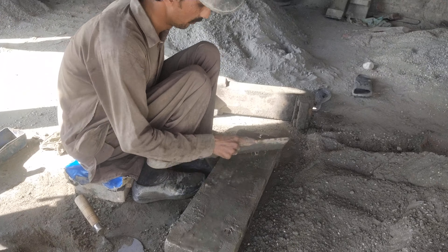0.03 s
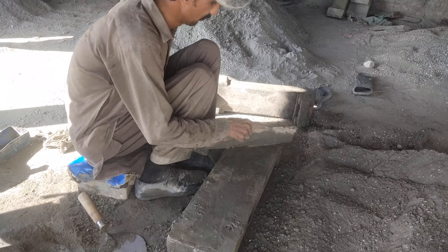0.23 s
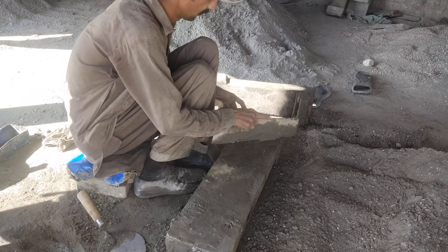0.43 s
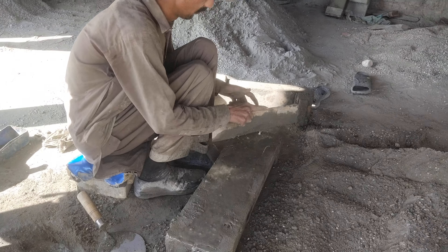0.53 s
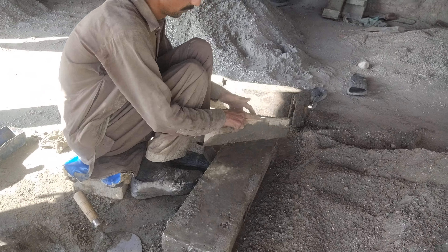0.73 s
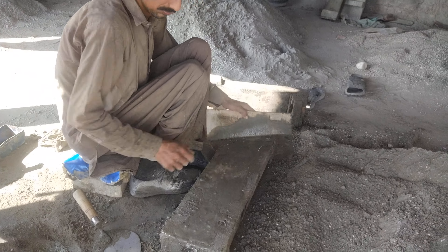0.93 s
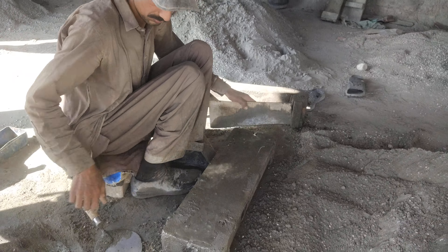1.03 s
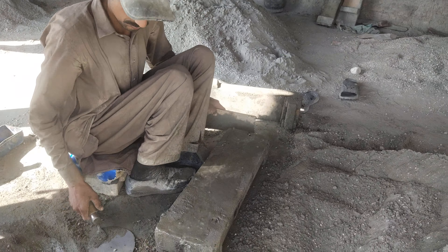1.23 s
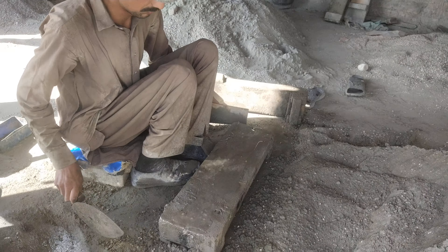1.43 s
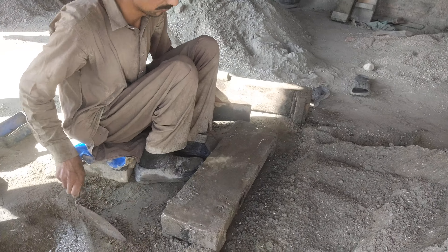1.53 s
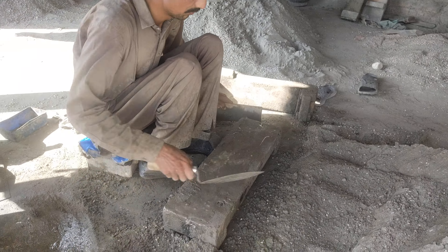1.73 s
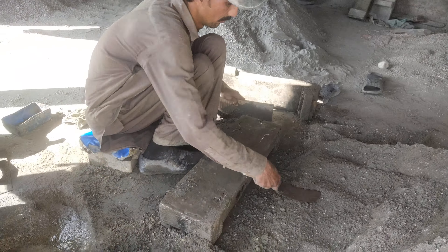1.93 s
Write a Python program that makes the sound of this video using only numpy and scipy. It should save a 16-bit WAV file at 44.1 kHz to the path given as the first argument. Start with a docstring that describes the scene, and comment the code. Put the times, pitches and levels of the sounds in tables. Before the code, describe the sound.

A cement block is patted three times before a steel trowel scrapes through sand and clacks.

```python
"""Under an open shed roof, a mason pats a fresh cement block three times: dull, hollow thumps
from the damped block, with a short echo off the walls. Sand rubs, a sleeve brushes and grit scrapes
as he shifts and reaches for a steel trowel. Slipping grains make the blade sing as it drags;
it clacks once on stone and slides on through the sand. A faint hum and distant rumble lie underneath."""
import sys
import numpy as np
from scipy import signal
from scipy.fft import rfft, irfft
from scipy.io import wavfile
from scipy.ndimage import uniform_filter1d

SR = 44100
rng = np.random.default_rng(int(sys.argv[2]) if len(sys.argv) > 2 else 0)


def generate_wav(sig):
    """Save sig (samples, or channels by samples) to the path in sys.argv[1] as 16-bit PCM at SR."""
    pcm = np.round(np.clip(np.atleast_2d(sig).T, -1, 1) * 32767).astype(np.int16)
    wavfile.write(sys.argv[1], SR, pcm)


N = 88200
T = np.arange(N) / SR
BIN_HZ = np.arange(N // 2 + 1) * SR / N


def from_db(db):
    """Decibels to gain."""
    return 10 ** (np.asarray(db) / 20)


def rms_one(x):
    """Scale to rms 1."""
    return x / np.sqrt(np.mean(x ** 2) + 1e-20)


def at_hz(points, hz):
    """Read a table on a log-frequency axis."""
    knots_hz, values = np.transpose(points)
    return np.interp(np.log(np.maximum(hz, 1)), np.log(knots_hz), values)


def envelope(rows):
    """Gain along a (t/s, level/dB) curve; silent beyond 30 ms outside it."""
    s, db = np.transpose(rows)
    return from_db(np.interp(T, s, db)) * (T >= s[0] - .03) * (T <= s[-1] + .03)


def bursts(rows, t60_s):
    """Envelope that jumps at each (t/s, level/dB) row and decays."""
    power = sum(from_db(2 * (db - 60 * np.maximum(T - s, 0) / t60_s)) * (T >= s) for s, db in rows)
    return np.sqrt(power)


def clicks(rows):
    """One impulse per (t/s, level/dB) row."""
    out = np.zeros(N)
    for s, db in rows:
        out[min(int(s * SR), N - 1)] += from_db(db)
    return out


def panned(db):
    """Constant-power gains, left minus right in dB."""
    gains = np.array([from_db(db / 2), from_db(-db / 2)]).reshape(2, -1)
    return gains / np.sqrt(np.mean(gains ** 2, axis=0))


def butter(x, order, hz, kind="low"):
    """Butterworth filter."""
    return signal.sosfilt(signal.butter(order, hz, kind, fs=SR, output="sos"), x)


def convolve(x, response):
    """Pass a sound through an impulse response."""
    return signal.fftconvolve(np.atleast_2d(x), np.atleast_2d(response), axes=1)[:, :N]


def ring(x, hz, t60_s):
    """One mode: a click starts a decaying sine."""
    radius, angle = from_db(-60 / (t60_s * SR)), 2 * np.pi * hz / SR
    return signal.lfilter([0, np.sin(angle)], [1, -2 * radius * np.cos(angle), radius ** 2], x + 1e-18)


def white():
    """Two independent white noises."""
    return rng.standard_normal((2, N))


def grit(grains_per_s=9000, spread_db=2.2):
    """Sand grains slip at random, a few much larger than the rest."""
    sizes = from_db(spread_db * np.minimum(rng.exponential(1, N), 5))
    return white() * sizes * (rng.random(N) < grains_per_s / SR)


def rubbed(modes):
    """Slipping grains excite a set of modes; rms 1."""
    slips = grit()
    return rms_one(sum(from_db(db) * ring(slips, hz, t60_s) for hz, db, t60_s in modes))


# Diffuse field: f/Hz, left-right correlation
CORRELATION = [(100, 0.95), (300, .88), (600, 0.33), (1200, -0.38), (2500, -0.014), (16000, -0.0078)]
def coloured(pair, spectrum, pan=None):
    """Two independent noises to diffuse stereo of a given spectrum; rms 1."""
    mid, side = rfft(pair)
    alike = np.clip(at_hz(CORRELATION, BIN_HZ), -.99, .99)
    stereo = np.sqrt(1 + alike) * mid + np.sqrt(1 - alike) * side * [[1], [-1]]
    if pan is not None:
        stereo = stereo * panned(at_hz(pan, BIN_HZ))
    return rms_one(irfft(stereo * from_db(at_hz(spectrum, BIN_HZ)), N))


# Rumble: f/Hz, level/dB
RUMBLE_SPECTRUM = [(25, -46), (45, -33), (68, 8), (90, 2), (130, 8), (220, -4.5), (400, -8.5), (1000, -10),
                   (3000, -16.5), (8000, -27.5), (16000, -44)]
# Hum: f/Hz, level/dB
HUM_TONES = [(67.3, -64.5), (203, -57)]
def background():
    """Distant rumble and a slightly wavering hum."""
    out = from_db(-61) * coloured(white(), RUMBLE_SPECTRUM)
    for hz, db in HUM_TONES:
        waver_hz = 1.98 * rms_one(uniform_filter1d(rng.standard_normal(N), size=6000))
        phase = 2 * np.pi * np.cumsum(hz + waver_hz) / SR
        out = out + from_db(db) * np.sqrt(2) * np.sin(phase)
    return out


# Rubbing: t/s, level/dB
RUB_LEVEL = [(0, -52), (.06, -59.5), (.125, -67), (.15, -67.5), (.22, -68), (.3, -63), (.43, -89),
             (.53, -72), (.58, -53), (.64, -44.5), (.68, -50.5), (.75, -60), (.95, -62.5)]
# Rubbed sand: f/Hz, level/dB
RUB_SPECTRUM = [(400, -20), (1200, 6.5), (1600, 3), (2000, 0), (2650, -11), (3300, -2.5), (4500, -11.5),
                (7000, -16), (10000, -26.5), (14000, -18), (16000, -27)]
# Block face: f/Hz, level/dB, t60/s
FACE_MODES = [(1563, 0.5, .04), (2654, 2, .03), (3230, -4.5, 0.035), (5640, -10, 0.01)]
def sand_rub():
    """Sand rubs on the block and makes its face rasp."""
    sand = from_db(-0.5) * coloured(grit(), RUB_SPECTRUM)
    rasp = from_db(-6.5) * rubbed(FACE_MODES)
    return envelope(RUB_LEVEL) * (sand + rasp)


# Body movement: t/s, level/dB
SHUFFLE_LEVEL = [(0, -53), (.1, -54.5), (.22, -60.5), (.95, -54.5), (1.1, -50.5), (1.25, -58.5),
                 (1.31, -49), (1.39, -46.5), (1.48, -53.5), (1.76, -54), (1.83, -43), (1.9, -51.5),
                 (2.0, -54.5)]
# Feet and clothes: f/Hz, level/dB
SHUFFLE_SPECTRUM = [(100, -26.5), (200, -3.5), (310, 1.5), (450, -2), (560, -4.5), (700, -9.5), (1500, -14),
                    (4000, -32.5)]
def shuffle():
    """Low noise of shifting feet and clothes."""
    return envelope(SHUFFLE_LEVEL) * coloured(white(), SHUFFLE_SPECTRUM)


# Brushing: t/s, level/dB
SLEEVE_LEVEL = [(.125, -94), (.145, -58.5), (.185, -73), (.21, -60), (.24, -64)]
# Cloth: f/Hz, level/dB
SLEEVE_SPECTRUM = [(4000, -24.5), (6300, -5), (7200, -1.5), (9000, -10), (11000, -9), (14500, -5),
                   (16000, -5.5)]
def sleeve():
    """A sleeve brushes past with a grainy hiss."""
    return envelope(SLEEVE_LEVEL) * coloured(grit(), SLEEVE_SPECTRUM)


# Two or three contacts per pat: t/s, level/dB, low-pass f/Hz, hollow boost/dB
PAT_CONTACTS = [(0.2423, -24.5, 1330, -28), (0.2446, -17.5, 1150, -14), (0.2507, -14, 1500, 2.5),
                (0.4558, -15.5, 900, 4), (0.458, -9, 1490, 4.5), (0.6486, -12.5, 2750, -0.5),
                (0.6506, -4.5, 1320, -1)]
# Block in its mould: f/Hz, level/dB, t60/s
BLOCK_MODES = [(295.6, -25.5, 0.13), (415, -13, 0.047), (461, -14.5, 0.031), (591.4, -11, 0.049),
               (709, -7, 0.026), (900, -7.5, 0.009), (1074, -15.5, 0.022), (1340, -19, 0.014),
               (2584, -6.5, 0.0034), (2870, -32, 0.0017)]
# Off the ground and nearby blocks: delay/s, level/dB
NEAR_REFLECTIONS = [(.0077, -11), (.0127, -13), (.0175, -20)]
def pats(hollow_hz=397, hollow_width_hz=28, wall_hz=260.4):
    """Soft contacts ring the damped block; close surfaces reflect it, a near wall only its lows."""
    forces = np.array([butter(clicks([(s, db)]) + 1e-18, 2, hz) for s, db, hz, _ in PAT_CONTACTS])
    hollow_db = np.array(PAT_CONTACTS)[:, 3]
    pan = [(400, 4.0), (650, 1.0), (1200, -4.0)]
    body = 0
    for hz, db, t60_s in BLOCK_MODES:
        hollow_share = np.exp(-((hz - hollow_hz) / hollow_width_hz) ** 2)
        drive = from_db(hollow_db * hollow_share) @ forces
        body = body + from_db(db) * ring(drive, hz, t60_s) * panned(at_hz(pan, hz))
    body = butter(body, 4, 228, "high")
    nearby = butter(clicks(NEAR_REFLECTIONS), 1, 1500)
    wall = butter(clicks([(.029, -2)]), 2, [wall_hz / 1.18, wall_hz * 1.18], "band")
    return body + convolve(body, nearby + wall)


# Reverberation: f/Hz, t60/s
SHED_DECAY = [(150, 0.78), (400, 0.3665), (1000, 0.49), (3000, 0.47), (12000, 0.75)]
# Reverberation: f/Hz, level/dB
SHED_SPECTRUM = [(110, -24), (170, 3.5), (240, 4), (290, 4), (335, -0.5), (420, 4), (650, 4), (1200, 0.5),
                 (3000, 0.5), (8000, -3), (16000, -12)]
def shed(build_s=0.0059, echo_s=.098, echo_build_s=0.0035):
    """Diffuse response of the shed, decaying band by band, plus a dull echo off a far wall."""
    noise = rfft(np.array([coloured(white(), SHED_SPECTRUM) for _ in range(2)]))
    centres_hz, tails = np.geomspace(100, 16000, 9), 0
    for hz in centres_hz:
        band = at_hz(np.column_stack([centres_hz, centres_hz == hz]), BIN_HZ)
        tails = tails + irfft(noise * band, N) * from_db(-60 * T / at_hz(SHED_DECAY, hz))
    diffuse = tails[0] * (1 - np.exp(-T / build_s))
    far_wall = butter(tails[1] * (1 - np.exp(-T / echo_build_s)), 2, 800)
    echo = convolve(clicks([(echo_s, -8.5)]), far_wall)
    return rms_one(diffuse + echo) / np.sqrt(N) * from_db(-3.5)


# Crushes: t/s, level/dB
CRUSH_BURSTS = [(0.2485, -34.5), (0.457, -42.5), (0.648, -35.5)]
# Crushed sand: f/Hz, level/dB
CRUSH_SPECTRUM = [(500, 3), (1500, 7.5), (3200, -1), (4200, -9), (6800, -8), (9000, -20.5), (14000, -6),
                  (16000, -24)]
def sand_crush():
    """Each pat crushes a little sand."""
    return coloured(grit(), CRUSH_SPECTRUM) * bursts(CRUSH_BURSTS, t60_s=0.056)


# Scraping: t/s, level/dB
SCRAPE_LEVEL = [(.95, -101), (.985, -54.5), (1.02, -44), (1.09, -49), (1.17, -48), (1.26, -49),
                (1.295, -38), (1.34, -45.5), (1.42, -48.5), (1.49, -55.5), (1.55, -53.5), (1.65, -57),
                (1.73, -58.5), (1.81, -43), (1.89, -50.5), (1.96, -44.5), (2.0, -45)]
# Scrape noise; thin tones ride above it near 6.8 and 14.8 kHz: f/Hz, level/dB
SCRAPE_SPECTRUM = [(50, -38), (300, -19), (750, -7.5), (1050, -5.5), (1700, -2), (3000, -5.5),
                   (5500, -12.5), (6800, -8), (8500, -19), (11000, -19.5), (13000, -19), (14800, -11.5),
                   (16000, -32)]
def ground_scrape():
    """Grit scrapes on the ground, louder with pressure."""
    pan = [(1000, -2), (6000, -0.5), (13000, 4.5)]
    return envelope(SCRAPE_LEVEL) * coloured(grit(), SCRAPE_SPECTRUM, pan)


# Dragging: t/s, level/dB
DRAG_LEVEL = [(1.26, -70), (1.295, -38.5), (1.33, -45), (1.4, -54), (1.5, -68)]
# Dragged blade: f/Hz, level/dB, t60/s
SINGING_MODES = [(1507, 8, 0.3), (1580, -5, .06), (1910, 6, .06), (2340, 6.5, 0.069), (2660, 5, 0.11),
                 (4200, 5, 0.072)]
def trowel_drag():
    """The blade sings as it is dragged over grit."""
    return envelope(DRAG_LEVEL) * rubbed(SINGING_MODES) * panned(-1.8)


# Steel meets grit or stone: t/s, level/dB, relative ring/dB
STEEL_CONTACTS = [(1.295, -28, -10), (1.5542, -3.5, -18), (1.5561, -3.5, 2.5)]
# Steel on stone: f/Hz, level/dB
CRACK_SPECTRUM = [(40, -38), (110, -40), (220, 0.5), (400, 3), (650, -8), (1500, -1.5), (3000, -2.5),
                  (4200, 1.5), (5200, -19), (5900, -8), (7000, -4), (9000, -15), (11500, -13),
                  (13200, -7.5), (15000, 6), (16500, -16)]
# Rattling grit: f/Hz, level/dB
RATTLE_SPECTRUM = [(40, -30), (130, -8), (230, 12), (650, 8.5), (1000, 6), (2000, 19.5), (3500, 4),
                   (5500, 1), (7000, -3), (9000, -14), (11500, -13), (13300, 11), (15000, 0), (16500, -24)]
# Blade and handle: f/Hz, level/dB, t60/s
TROWEL_MODES = [(511, -34, .18), (899, -34, .24), (1404, -30, .18), (1502, -24, .13), (2104, -27, .28),
                (2326, -33, .15), (2962, -29, .14), (250, -33, .06), (375, -27, .05), (795, -33, .12),
                (1130, -30, .11), (1270, -32, .07), (1740, -32, .07), (2000, -31, .06), (2762, -33, .07),
                (4040, -25, .022), (4970, -24, .022), (6720, -29, .04)]
# Trowel direction: f/Hz, left minus right/dB
TROWEL_PAN = [(300, 0), (900, -1), (1500, -7), (2500, -3), (4500, -1), (7500, 1), (13000, 5.5), (16000, 18)]
def trowel_clack(left_lag_s=0.00019):
    """A light touch, then the clack: each contact cracks, rattles grit and rings the blade."""
    hits = [(s, db) for s, db, _ in STEEL_CONTACTS]
    crack = from_db(-15) * coloured(white(), CRACK_SPECTRUM, TROWEL_PAN) * bursts(hits, t60_s=0.026)
    rattle = from_db(-24.5) * coloured(grit(), RATTLE_SPECTRUM, TROWEL_PAN) * bursts(hits, t60_s=0.095)
    blows = clicks([(s, db + ring_db) for s, db, ring_db in STEEL_CONTACTS])
    blade = 0
    for k, (hz, db, t60_s) in enumerate(TROWEL_MODES):
        right = (-1) ** k * from_db(db) * ring(blows, hz, t60_s)
        left = np.interp(T - left_lag_s, T, right)
        blade = blade + panned(at_hz(TROWEL_PAN, hz)) * np.array([left, right])
    return crack + rattle + blade


# Snaps and a bounce: t/s, level/dB
SNAP_BURSTS = [(1.296, -35.5), (1.5225, -42.5), (1.6385, -30), (1.989, -28), (1.996, -37.5)]
# Snapping grain: f/Hz, level/dB
SNAP_SPECTRUM = [(1500, -25), (4500, -22), (6800, 0), (9000, -6.5), (11500, -7), (13500, 1), (16000, -0.5)]
def grain_snaps():
    """Single grains snap under the blade; at 1.64 s the trowel bounces."""
    return coloured(grit(), SNAP_SPECTRUM, TROWEL_PAN) * bursts(SNAP_BURSTS, t60_s=0.026)


def scene():
    """Block and trowel impacts reverberate in the shed; friction and background stay dry."""
    block = pats() + sand_crush()
    steel = trowel_clack() + grain_snaps()
    reverberation = convolve(from_db(-5.5) * block + from_db(-7) * steel, shed())
    friction = sand_rub() + ground_scrape() + trowel_drag() + sleeve() + shuffle()
    return block + steel + reverberation + friction + background()


def record(dry):
    """Steep low-pass at 16.3 kHz."""
    return signal.sosfilt(signal.ellip(10, .2, 80, 16300, fs=SR, output="sos"), dry)


dry = scene()
out = record(dry)
generate_wav(out)
```